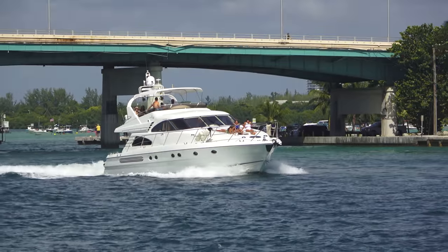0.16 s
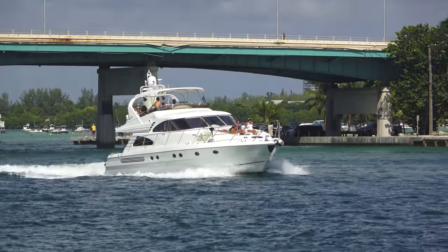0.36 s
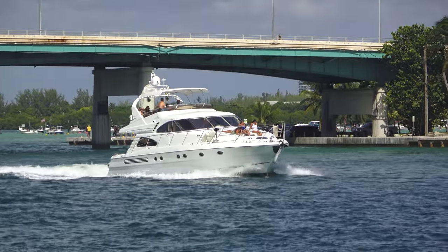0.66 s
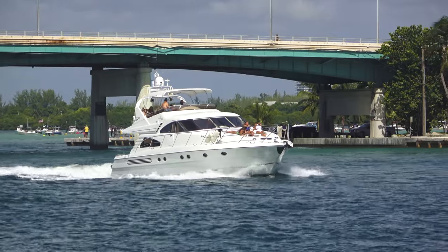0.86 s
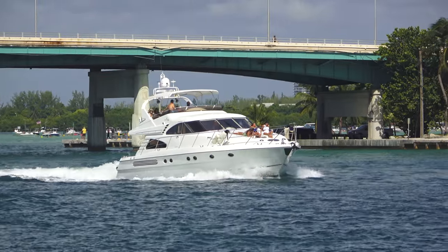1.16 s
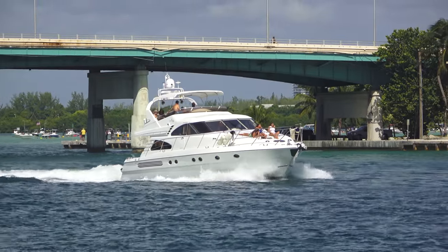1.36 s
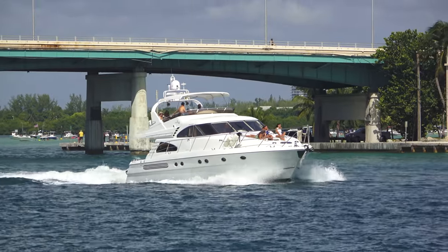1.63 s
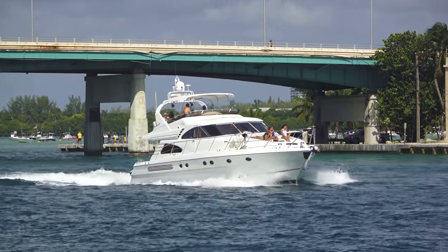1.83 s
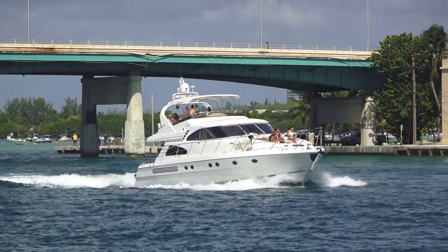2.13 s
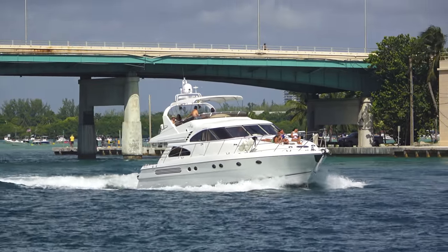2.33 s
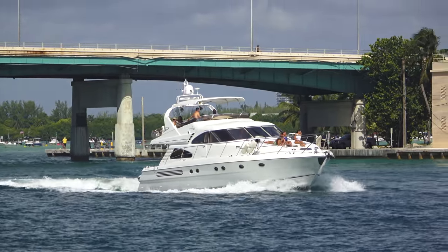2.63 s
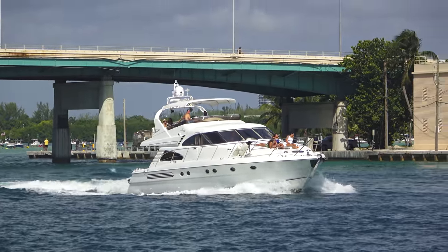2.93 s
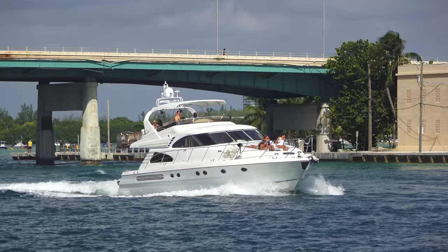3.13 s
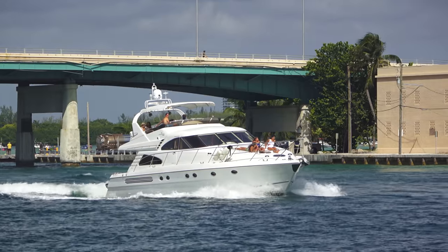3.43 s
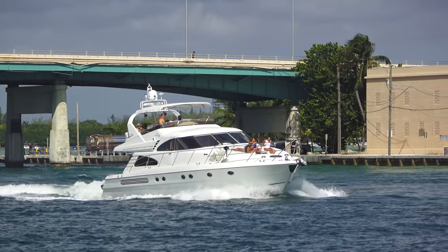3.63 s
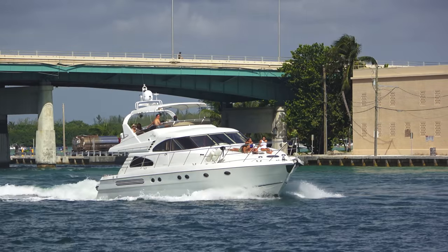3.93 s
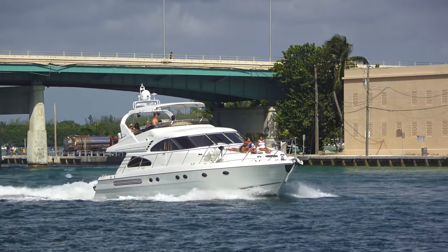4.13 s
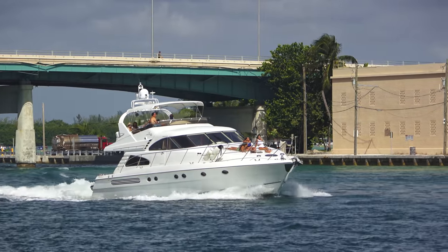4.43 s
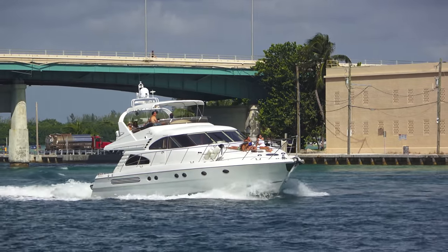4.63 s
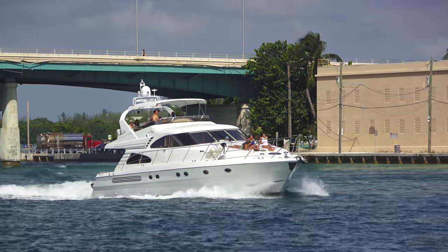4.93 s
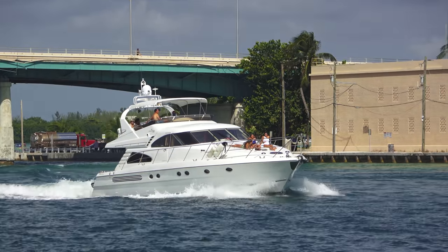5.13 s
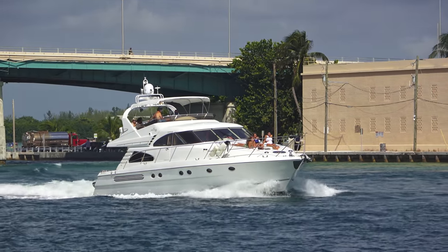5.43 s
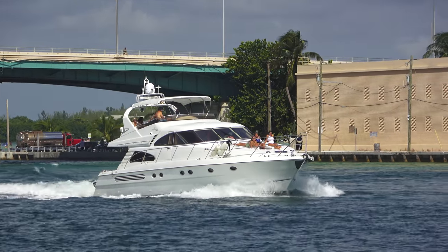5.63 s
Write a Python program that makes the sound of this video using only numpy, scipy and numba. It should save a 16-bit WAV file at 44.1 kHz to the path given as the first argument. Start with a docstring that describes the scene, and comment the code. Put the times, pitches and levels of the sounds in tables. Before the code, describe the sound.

Low wind rumble over a yacht's wavering engine hum and the soft rush of its wake, with water lapping, gulping and dripping at the shore.

```python
"""A motor yacht's engines hum low as it cruises along a channel, heard from the water's edge on a breezy day.
The hum is a few wavering multiples of the firing rate; the rush of hull and wake is filtered noise.
Close by, waves break in bubbles and noise that churn and throw spray, with a surge booming in a hollow;
foam hisses, trapped air gulps in rising tones, drops ring and droplets tick in short noise bursts.
Wind buffets the microphone as low noise that follows the gusts."""
import sys
import numpy as np
from scipy import signal
from scipy.fft import rfft, irfft
from scipy.io import wavfile
from scipy.ndimage import uniform_filter1d
from numba import njit

SR = 44100
rng = np.random.default_rng(int(sys.argv[2]) if len(sys.argv) > 2 else 0)


def to_wav(s):
    """Save 16-bit WAV."""
    ch = np.atleast_2d(s).T  # columns
    pcm = np.round(np.clip(ch, -1, 1) * 32767)  # PCM
    wavfile.write(sys.argv[1], SR, pcm.astype(np.int16))


N = 254898
TIME = np.arange(N) / SR  # [s]


def undb(db):
    """Decibels to gain."""
    return 10 ** (np.asarray(db) / 20)


def unit(x):
    """Scale to rms 1."""
    return x / np.sqrt(np.mean(x ** 2))


def noise():
    """White noise of rms about 1."""
    return rng.standard_normal(N)


def curves(table):
    """Each column of a table after the time, joined by straight lines in time."""
    s, *columns = np.transpose(table)
    return [np.interp(TIME, s, column) for column in columns]


def colour(x, spectrum):
    """Filter by (frequency [Hz], gain [dB]) points, falling 20 dB per octave beyond both ends; rms 1."""
    hz, db = np.transpose(spectrum)
    octave = np.log2(np.maximum(np.fft.rfftfreq(N, 1 / SR), 1))
    points = np.log2(hz)
    octaves_outside = np.abs(octave - np.clip(octave, points[0], points[-1]))
    gain = undb(np.interp(octave, points, db) - 20 * octaves_outside)
    return unit(irfft(rfft(x) * gain, N))


def walk(rate):
    """Smooth random motion with spread 1, changing about rate times a second."""
    soft = np.exp(-np.fft.rfftfreq(N, 1 / SR) ** 2 / rate ** 2)
    return unit(irfft(rfft(noise()) * soft, N))


def swell(s, half_length, db):
    """A bell-shaped gain around s, down to 1/e of its height after half_length seconds."""
    return undb(db) * np.exp(-((TIME - s) / half_length) ** 2)


@njit
def bubbles(s, hz, size, cycles, glide, onset):
    """Each bubble swells over onset cycles, then dies by 40 dB over its cycles while its pitch rises."""
    out = np.zeros(N)
    for k in range(len(s)):
        start = int(s[k] * SR)
        length = cycles[k] * SR / hz[k]  # samples, counted at the starting pitch
        phase = 0.  # in turns
        for i in range(max(0, min(int(1.5 * length), N - start))):
            phase += hz[k] * (1 + glide * i / length) / SR
            onset_gain = 1 - np.exp(-(phase / onset) ** 2)
            decay = np.exp(-4.6 * i / length)
            out[start + i] += size[k] * onset_gain * decay * np.sin(2 * np.pi * phase)
    return out


def froth(low_hz, high_hz, cycles, spread_db, count):
    """A crowd of bubbles with an even spectrum, a few of them stronger (weaker if spread_db < 0); rms 1."""
    when, pitch, strength, life = rng.random((count, 4)).T
    hz = low_hz * (min(high_hz, SR / 3) / low_hz) ** pitch
    # strength in proportion to pitch makes up for the shorter life of high bubbles
    size = hz * undb(-spread_db * np.log(.01 + strength))
    return unit(bubbles(when * N / SR, hz, size, cycles * (.5 + life), 0.23, 0.38))


def wind():
    """Eddies push on the microphone; the gusts set their strength and flutter a little."""
    # gusts at the microphone, before the trim: (time [s], level [dB])
    gusts = [(0.0, -10.5), (0.29, -11.5), (0.39, -22), (0.45, -13), (1.61, -12.5), (1.69, -19),
             (2.11, -19.5), (2.19, -13), (2.25, -17), (2.4, -10), (2.43, -14), (2.48, -7.5), (2.53, -20.5),
             (2.61, -9.5), (2.74, -14), (3.8, -10), (4.04, -15), (4.14, -8.5), (4.17, -21.5), (4.27, -11.5),
             (4.68, -18.5), (5.15, -12.5), (5.18, -18.5), (5.34, -9), (5.52, -16), (5.54, -25), (5.78, -11)]
    # tone of the buffeting: (frequency [Hz], level per Hz [dB])
    buffet_spectrum = [(12, -26), (24, -4.5), (36, 0), (60, -1.5), (100, -6.5), (130, -14), (200, -23.5),
                       (400, -38.5), (900, -60)]
    trim_db, flutter_db, flutter_per_s = 1, 0.6, 6.3
    gust_db, = curves(gusts)
    eddies = colour(noise(), buffet_spectrum)
    # over some 90 ms the pressure of the eddies stays close to that of the gust that carries them
    eddies /= np.sqrt(uniform_filter1d(eddies ** 2, size=4000))
    push = eddies * undb(gust_db + trim_db + flutter_db * walk(flutter_per_s))
    return .8 * np.tanh(push / .8)  # peaks round off below 0.8


def wake():
    """The far rush of hull and wake: low noise that grows, then fades as the yacht moves on."""
    # rush over the water: (time [s], level [dB])
    rush = [(0, -29), (1.5, -26), (3, -29), (5.78, -30.5)]
    # tone of the rush: (frequency [Hz], level per Hz [dB])
    rush_spectrum = [(90, -23), (200, -2), (300, -2.5), (450, -4.5), (650, -11.5), (1200, -12.5),
                     (4000, -33.5), (15000, -55)]
    rush_db, = curves(rush)
    return colour(noise(), rush_spectrum) * undb(rush_db + 0.3 * walk(4))


def foam():
    """Countless tiny bubbles burst in a fine, airy hiss, made of high noise."""
    # foam after a wave has broken: (time of its height [s], half length to 1/e [s], level [dB])
    patches = [(0.13, .05, -50), (2.5, 0.092, -59), (4.4, 0.48, -56.5)]
    hiss = colour(noise(), [(8000, -16), (10500, 2), (12500, 0), (14000, -4), (15500, -11)])
    return hiss * sum(swell(*patch) for patch in patches) * undb(1.5 * walk(40))


def droplets():
    """Fine droplets landing close by only tick: bursts of high noise with a sharp start."""
    # landings: (time [s], level at the start [dB])
    landings = [(0.120, -28), (0.187, -32), (1.032, -31.5), (1.444, -28.5), (2.048, -36), (2.411, -32),
                (3.104, -33), (3.157, -33)]
    decay_s = 0.001
    ticks = sum(undb(db) * np.exp(-np.abs(TIME - s) / decay_s) * (TIME > s) for s, db in landings)
    return ticks * colour(noise(), [(4500, -4), (8500, 8), (15000, -7)])


def drops():
    """A large drop slaps the surface in a short, soft splash and rings a tiny bubble."""
    # slaps: (time [s], starting pitch of the ring [Hz], level before the ring and splash offsets [dB])
    slaps = [(0.558, 2550, -13.5), (2.469, 3860, -19), (2.503, 4190, -19), (2.825, 3670, -17.5),
             (2.833, 3950, -13), (2.974, 4850, -16.5), (3.451, 4127, -22), (4.219, 4070, -14),
             (4.82, 4600, -14.5), (4.871, 4730, -18.5), (5.250, 3050, -18.5), (5.765, 3880, -15)]
    ring_db, ring_cycles = 3.5, 15.3
    splash_db, splash_s = -11.5, 0.0027
    s, hz, db = np.transpose(slaps).copy()
    rings = bubbles(s, hz, undb(db + ring_db), np.full(len(s), ring_cycles), 0.11, 1.15)
    splash_gain = sum(swell(t + 0.0017, splash_s, level + splash_db) for t, level in zip(s, db))
    splash = colour(noise(), [(900, 10.0), (2500, 1.5), (4500, 3.5), (6000, -8), (9000, -19)])
    return rings + splash_gain * splash


def gulps():
    """Large pockets of air trapped under the lapping water ring, rising in pitch as they die away."""
    # pockets: (time [s], starting pitch [Hz], strength before onset and decay [dB], cycles to fall 40 dB)
    pockets = [(0.772, 795, -18, 27), (1.393, 1772, -17, 33), (1.656, 1311, -13, 36),
               (1.794, 270, 3.5, 5.4), (1.856, 443, -11.5, 17), (1.939, 294, 0.5, 7.5),
               (1.951, 351, -11, 25), (1.986, 303, -0.5, 8.6), (2.038, 259, -8.5, 19), (2.075, 260, -5, 14),
               (2.108, 570, -16, 26), (2.112, 263, -3, 12), (3.158, 650, -17.5, 16.4),
               (3.721, 990, -6.5, 14.6), (3.793, 890, -9, 10.5), (5.738, 559, -14, 12.5)]
    s, hz, db, cycles = np.transpose(pockets).copy()
    return bubbles(s, hz, undb(db), cycles, glide=0.18, onset=0.86)


def surf():
    """Waves swell to their break, then drain exponentially: churn gain, spray gain, coarse share."""
    # waves: (time of the break [s], rise from 1/e [s], fall to 1/e [s], churn [dB], spray [dB],
    #         share of large dull drops [0-1])
    waves = [(0.08, 0.18, 0.33, -26, -29, 0.4), (0.56, 0.12, 0.088, -31, -37, 0),
             (1.12, 0.14, 0.66, -30.5, -34, .1), (1.48, 0.06, 0.12, -24.5, -29.5, .05),
             (1.77, 0.22, 0.26, -29, -28.5, 0.3), (2.28, 0.093, .18, -29.5, -39.5, .3),
             (2.46, 0.1, 0.18, -33, -32, .25), (2.97, 0.14, .08, -33.5, -31.5, 0.4),
             (3.82, 0.1, 0.3, -26, -33, 0.5), (4.26, 0.3, 0.97, -27.5, -31, 0.66),
             (4.85, 0.24, .09, -46, -38.5, 0.2), (5.26, 0.024, 0.042, -31, -34, 0),
             (5.5, .04, 0.29, -33.5, -34, 0.1), (5.77, 0.05, .2, -34, -34.5, 0.29)]
    # steady lapping under the waves; all add in power
    lap_churn_db, lap_spray_db, lap_coarse = -33.5, -38.5, 0.18
    churn_power = undb(lap_churn_db) ** 2
    spray_power = undb(lap_spray_db) ** 2
    coarse_power = lap_coarse * spray_power
    for s, rise, fall, churn_db, spray_db, coarse in waves:
        shape = np.where(TIME < s, swell(s, rise, 0), np.exp(-np.abs(TIME - s) / fall))
        thrown = (shape * undb(spray_db)) ** 2
        churn_power = churn_power + (shape * undb(churn_db)) ** 2
        spray_power = spray_power + thrown
        coarse_power = coarse_power + coarse * thrown
    return np.sqrt(churn_power), np.sqrt(spray_power), np.clip(coarse_power / spray_power, 0, 1)


def spray(gain, coarse):
    """Small bubbles fizz and droplets patter in a mist; coarse spray has less treble."""
    # tone of fine spray: (frequency [Hz], level per Hz [dB])
    spray_spectrum = [(700, -14.5), (1400, 1.5), (2000, 1.5), (2800, -1.5), (3500, 1), (4200, -0.05),
                      (5100, -6), (7000, -12.5), (9000, -18), (12500, -25), (15500, -27)]
    fizz = froth(1747, 14700, cycles=13.6, spread_db=3.5, count=12000)
    # droplets hit at random moments, a few of them much harder than the rest
    force = undb(3.1 * np.minimum(noise(), 2.8))
    hits = rng.random(N) < .015
    patter = unit(rng.choice([-1, 1], N) * hits * force)
    mist = noise()
    fine = colour(fizz + undb(-2.0) * patter + undb(2.0) * mist, spray_spectrum)
    dull = colour(fine, [(900, 3), (2200, -2.0), (4500, -3.5), (8000, -11)])
    mixed = (1 - coarse) * fine + coarse * dull
    return mixed * gain * undb(1.39 * walk(52))


def churn(gain):
    """Water tumbles into bubbles and noise at the shore; one wave surges and booms in a hollow."""
    # tone of the tumbling water: (frequency [Hz], level per Hz [dB])
    churn_spectrum = [(130, -64), (280, 4), (450, 2), (650, 1.5), (900, 1), (1200, 1), (1600, -6),
                      (2200, -11), (3200, -18), (8000, -41)]
    # one surge into a hollow of the shore: (time of its height [s], half length to 1/e [s], level [dB])
    surge_shape = (1.93, 0.17, -23.5)
    # tone of the hollow: (frequency [Hz], level per Hz [dB])
    hollow_spectrum = [(150, -24), (250, 4), (350, -5), (480, -1.5), (700, -11.5), (1400, -8.5),
                       (2500, -38)]
    tumble = froth(218.5, 3020, cycles=14.7, spread_db=2.0, count=6000) + undb(6.5) * noise()
    surge_froth = froth(162, 1970, cycles=5.2, spread_db=-0.5, count=4000)
    surge = colour(surge_froth, hollow_spectrum) * swell(*surge_shape)
    return colour(tumble, churn_spectrum) * gain * undb(0.8 * walk(25)) + surge


def engines():
    """Low orders of the exhaust, sines at multiples of the firing rate; each wavers over the water."""
    # third multiple of the firing rate, before trim and waver: (time [s], pitch [Hz], level [dB])
    third_order = [(0.0, 152.2, -27), (0.93, 155.1, -27.5), (1.05, 164.5, -27), (2.37, 152.4, -25),
                   (2.62, 140.5, -31), (2.88, 143.4, -24.5), (3.27, 164.9, -27), (4.4, 166.1, -28),
                   (4.72, 144.3, -31), (4.8, 155.7, -28), (5.07, 142.7, -32.5), (5.17, 154.2, -27),
                   (5.68, 155.8, -23.5), (5.78, 160.7, -36.5)]
    # exhaust note: (multiple of the firing rate, level against the third multiple [dB])
    exhaust = [(1, 2), (2, -3.5), (3, 0), (4, -18.5), (5, -20), (6, -21.5)]
    trim_db = -.5
    waver_db, waver_per_s = 2., 4.9
    waver_rad, phase_waver_per_s = 0.32, 11.6
    hum_hz, hum_db = curves(third_order)
    firing_turns = np.cumsum(hum_hz / 3) / SR
    note = np.zeros(N)
    for multiple, db in exhaust:
        level = undb(db + waver_db * walk(waver_per_s))
        turns = multiple * firing_turns + rng.random()
        note += level * np.sin(2 * np.pi * turns + waver_rad * walk(phase_waver_per_s))
    # the root of 2 turns the levels from peak to rms
    return np.sqrt(2) * note * undb(hum_db + trim_db)


def scene():
    """Wind, water and yacht in one channel."""
    churn_gain, spray_gain, coarse = surf()
    water = foam() + droplets() + drops() + gulps() + spray(spray_gain, coarse) + churn(churn_gain)
    return (wind() + wake() + water + engines())[None]


def record(dry):
    """The sound fades in over 3 ms; the recorder cuts the top above 15.5 kHz."""
    fade = np.minimum(TIME / .003, 1)
    top_cut = signal.ellip(10, .1, 80, 15500, fs=SR, output="sos")
    return signal.sosfilt(top_cut, dry * fade)


dry = scene()
out = record(dry)
to_wav(out)
```